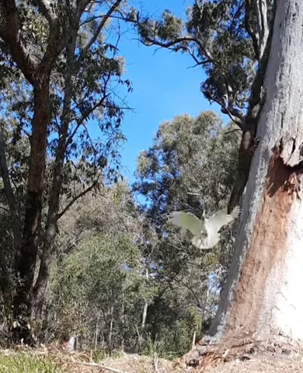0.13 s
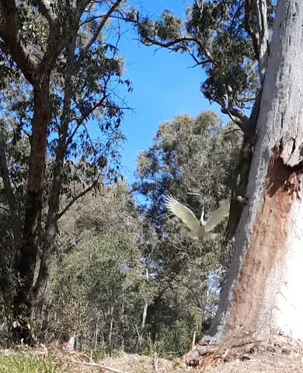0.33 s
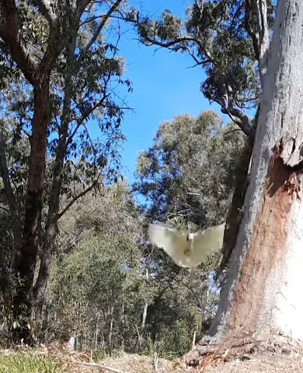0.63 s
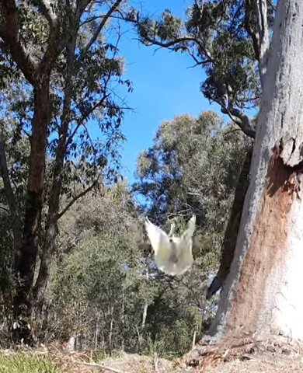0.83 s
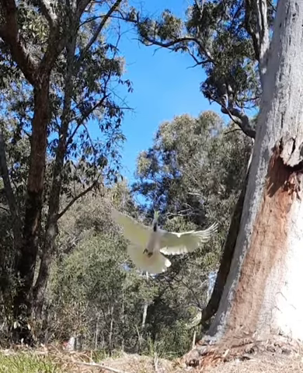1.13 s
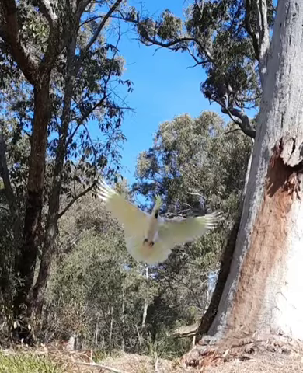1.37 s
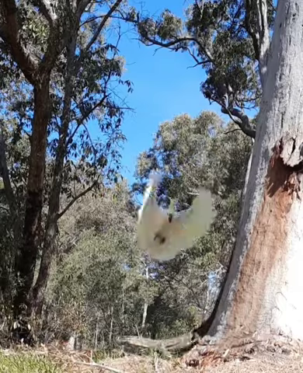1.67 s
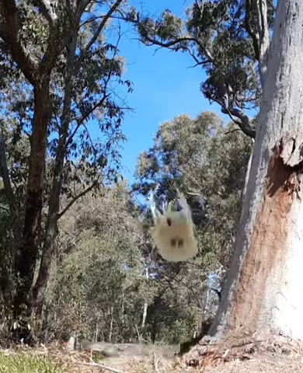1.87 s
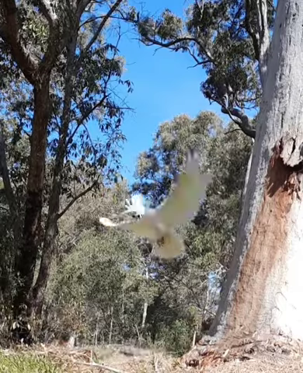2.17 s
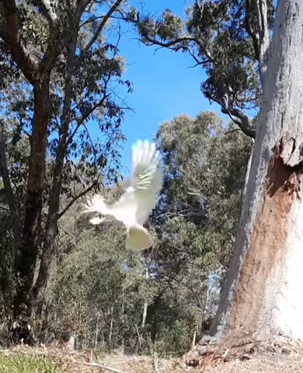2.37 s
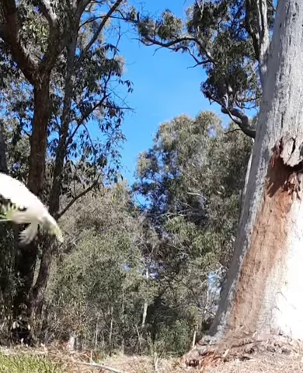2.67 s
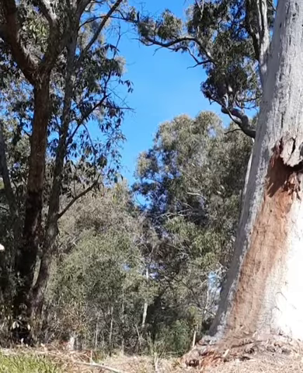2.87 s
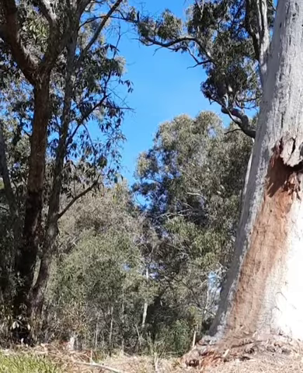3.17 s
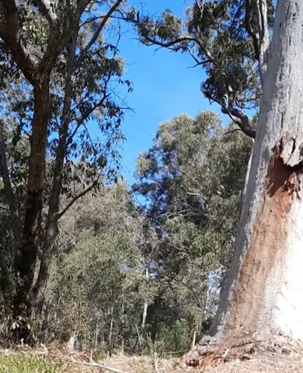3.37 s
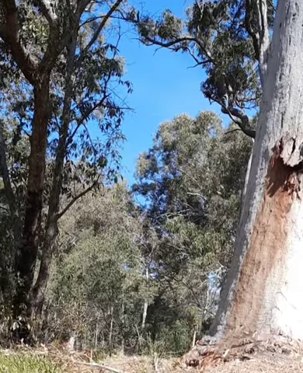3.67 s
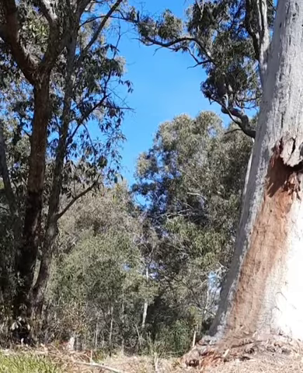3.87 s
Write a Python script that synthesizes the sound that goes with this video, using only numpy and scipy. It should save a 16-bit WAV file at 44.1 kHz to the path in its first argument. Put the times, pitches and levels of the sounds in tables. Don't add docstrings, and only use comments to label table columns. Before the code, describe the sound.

Loud rasping cockatoo screeches repeat in open woodland, with wing flaps as the bird leaves

```python
import sys
import numpy as np
from scipy import signal
from scipy.fft import rfft, irfft, next_fast_len
from scipy.io import wavfile
from scipy.ndimage import map_coordinates

SR = 44100
rng = np.random.default_rng(int(sys.argv[2]) if len(sys.argv) > 2 else 0)


def invert_db(level):
    return 10 ** (np.asarray(level, dtype=float) / 20)


def master(y):
    cut = np.clip(np.atleast_2d(y).T, -1, 1)
    pcm = np.round(cut * 32767)
    wavfile.write(sys.argv[1], SR, pcm.astype(np.int16))


N = 176400

ALIKE = 0.11


def along(points, hz):
    f, v = np.transpose(points)
    return np.interp(np.log(hz + 1), np.log(f + 1), v)


def curve(rows):
    return np.interp(np.arange(N) / SR, *np.transpose(rows))


def unit(x):
    return x / np.sqrt(np.mean(x ** 2) + 1e-20)


def wobble(rate):
    knots = rng.standard_normal(int(N * rate / SR) + 4)
    return map_coordinates(knots, [np.arange(N) * rate / SR])


def filtered(x, response):
    m = next_fast_len(N + SR // 2)
    return irfft(rfft(x, m) * response(np.fft.rfftfreq(m, 1 / SR)), m)[..., :N]


def resonances(table, cut_hz):
    def response(f):
        high_pass = (-f * f / (cut_hz ** 2 - f * f + 1j * f * cut_hz)) ** 2
        total = 0
        for k, (centre, width, db) in enumerate(table):
            ring = 1j * f * width / (centre * centre - f * f + 1j * f * width)
            total = total + (-1) ** k * invert_db(db) * ring
        return high_pass * total
    return response


def noise(spectrum, alike):
    a, b = filtered(rng.standard_normal((2, N)), lambda hz: invert_db(along(spectrum, hz)))
    u = np.arccos(np.clip(alike, 0, 1)) / 2
    return unit(np.array([np.cos(u) * a + np.sin(u) * b, np.cos(u) * a - np.sin(u) * b]))


def cockatoo():
    # (start [s], length [s], level [dB], swell over the call [dB], chest level [dB])
    screeches = [
        (-.4, 0.58, -13, -6, -5),
        (0.318, 0.6, -16, -0.5, -3),
        (1.058, .474, -15, -2.5, -0.5),
        (1.69, 0.58, -15.5, -2, 0),
        (2.448, .562, -19.5, -4, 0.5),
        (3.19, .497, -33.5, 4.5, 8.5),
    ]
    # (time [s], roughness [0-1])
    roughness = [(0, .03), (.066, .03), (.085, 1), (.815, 1), (.83, .03), (.884, .03), (.895, .4),
                 (1.1, .9), (1.26, .9), (1.28, .4), (1.35, .4), (1.37, .8), (1.47, .5), (1.6, 1), (2.15, 1),
                 (2.25, .6), (2.5, .9), (4, 1)]
    # (time [s], level [dB])
    turned = [(0, -2), (.4, 0.5), (1.45, -1), (1.75, -4.5), (1.98, -1.5), (2.05, -7), (2.5, -10.5),
              (2.8, -12.5), (3.3, -18), (3.7, -7)]
    # (frequency [Hz], width [Hz], level [dB])
    chest = [(417, 306, -23), (701, 139, -21.5), (936, 122, -15.5), (1435, 454, -22.5)]
    # (frequency [Hz], width [Hz], level [dB])
    mouth = [(6700, 2700, -32.5), (9200, 1640, -21), (11970, 1870, -20), (15340, 1300, -32.5)]
    slap_hz, start_sag, sag_s, end_sag = 220.43, .38, .06, .2
    attack_s, attack_db, release_s, release_db = 0.071, 13.5, .03, 22
    chest_lingers_db, surge_db, crack_scatter_db = 23, .6, 2
    pipe_db, pipe_turns = 12, .12
    wander, droop = .025, .07

    t = np.arange(N) / SR
    starting, ending, gain, chest_db, loss_db = np.zeros((5, N))
    hz = np.full(N, slap_hz)
    for s, length, db, swell_db, low_db in screeches:
        on = (t >= s) & (t < s + length)
        rise = np.clip(1 - (t - s) / attack_s, 0, 1)
        fall = np.clip(1 - (s + length - t) / release_s, 0, 1)
        level_db = db + swell_db * (t - s) / length
        gain += on * invert_db(level_db - attack_db * rise ** 2 - release_db * fall ** 2)
        hz *= 1 - on * (start_sag * np.clip(1 - (t - s) / sag_s, 0, 1) + end_sag * fall)
        ending += on * fall
        starting += on * rise
        since = t >= s
        chest_db[since] = (low_db + chest_lingers_db * fall ** 2)[since]
        loss_db[since] = screeches[1][2] - db

    whistle, falter = whistles()
    gain *= falter
    rough = curve(roughness)
    slaps = syrinx(hz, rough, starting)
    tuning = 1 + wander * rough * wobble(70) - droop * ending
    drive = invert_db(pipe_db) * slaps * gain * invert_db(surge_db * wobble(15))
    turn_db = curve(turned)
    pipe = windpipe(drive * invert_db(pipe_turns * turn_db), tuning)
    crackle = invert_db(turn_db + crack_scatter_db * rough * wobble(200))
    beak = filtered(drive * crackle, resonances(mouth, 3670))
    body = filtered(drive * invert_db(chest_db), resonances(chest, 400))
    return pipe + beak + body + whistle, loss_db


def syrinx(hz, rough, starting):
    jitter, scatter_db, extra_share, extra_db = .13, 2.2, .65, -4
    calm_db, breath_db = 3, -7.5
    phase = np.cumsum(hz * (1 + jitter * rough * wobble(120))) / SR
    at = np.flatnonzero(np.diff(np.floor(phase)))
    r = rough[at]
    size, extra_size = rng.standard_normal((1200, 2))[:len(at)].T
    coin, lead = rng.random((1200, 2))[:len(at)].T
    ahead = np.maximum(at - ((.2 + .45 * lead ** 2) * SR / hz[at]).astype(int), 0)
    slaps = np.bincount(at, invert_db(scatter_db * r * size), N)
    slaps += np.bincount(ahead, (coin < extra_share * r) * invert_db(extra_db + scatter_db * extra_size), N)
    leak = np.exp(-1.1 * (phase % 1)) * rng.standard_normal(N)
    breath = invert_db(breath_db) * np.sqrt(rough) * (1 - .6 * starting) * unit(leak)
    return unit(slaps) * invert_db(calm_db * (1 - rough)) + breath


def windpipe(drive, tuning):
    # (frequency [Hz], level [dB])
    pipe_modes = [(2070, -2.5), (2790, -1.5), (3800, -2.5), (4800, -10), (5750, -14)]
    relative_width, tunings = .072, (.93, 1, 1.045)
    step = np.interp(tuning, tunings, np.arange(len(tunings)))
    total = np.zeros(N)
    for k, u in enumerate(tunings):
        share = np.clip(1 - np.abs(step - k), 0, 1) ** .7
        modes = [(hz * u, hz * relative_width, db) for hz, db in pipe_modes]
        total += filtered(drive * share, resonances(modes, 1650))
    return total


def whistles():
    # (start [s], length [s], pitch [Hz], level [dB])
    tones = [(.768, .04, 965, -31), (1.356, .016, 1000, -34), (.575, .02, 960, -35), (.68, .022, 950, -35),
             (.72, .02, 990, -35), (1.4, .012, 980, -35)]
    falter_db = -2.5
    t = np.arange(N) / SR
    whistle, falter = np.zeros(N), np.ones(N)
    for s, length, pitch_hz, db in tones:
        bell = np.sin(np.pi * np.clip((t - s) / length, 0, 1)) ** .5
        whistle += invert_db(db) * np.sqrt(2) * bell * np.sin(2 * np.pi * pitch_hz * t)
        falter *= invert_db(falter_db * bell)
    return whistle, falter


def wings():
    # (time [s], level [dB])
    snap_times = [(2.1936, -28), (2.5478, -35), (2.5663, -27), (2.7159, -34), (2.7638, -21), (2.8546, -33),
                  (2.899, -31), (2.96, -34)]
    # (frequency [Hz], level [dB])
    feather = [(1500, -30), (4000, -12), (8000, -7), (10500, 2), (14500, -2)]
    # (time [s], level [dB])
    passing = [(2.3, -71), (2.8, -39.5), (2.97, -47), (3.2, -48), (3.5, -47.5), (3.8, -69.5)]
    # (frequency [Hz], level [dB])
    swish_colour = [(800, -21), (2000, 8), (4500, 12), (7000, 11.5), (8500, 7), (10500, 15), (14500, -3)]
    snap_db, snap_t60_s, flap_db = 9, .005, 2
    clap_s, clap_hz, clap_db, clap_len_s = 2.762, 1880, -21, .011

    t, snaps = np.arange(N) / SR, np.zeros(N)
    for s, db in snap_times:
        snaps += (t >= s) * invert_db(db + snap_db - 60 * np.abs(t - s) / snap_t60_s)
    snaps = filtered(snaps * rng.standard_normal(N), lambda hz: invert_db(along(feather, hz)))
    bell = np.exp(-((t - clap_s) / clap_len_s) ** 2)
    clap = invert_db(clap_db) * bell * np.sin(2 * np.pi * clap_hz * t + 0.85 * wobble(170))
    swish_db = curve(passing) + flap_db * wobble(9) + 1.23 * wobble(60)
    return snaps + clap, invert_db(swish_db) * noise(swish_colour, ALIKE)


def trees(x):
    # (frequency [Hz], time to fall 60 dB [s])
    decay = [(400, .45), (1500, .6), (2500, .66), (5000, .6), (12000, .5)]
    # (frequency [Hz], level [dB])
    echo_colour = [(400, -3), (1500, 0), (2050, 1), (3000, -1), (5000, 0), (12000, -2)]
    delay_s = .015
    hz, t, z = signal.stft(rng.standard_normal((2, SR)), SR, nperseg=256)
    fade_db = along(echo_colour, hz)[:, None] - 60 * t / along(decay, hz)[:, None]
    a, b = signal.istft(z * invert_db(fade_db), SR, nperseg=256)[1]
    tail = np.array([a, ALIKE * a + np.sqrt(1 - ALIKE ** 2) * b])
    late = np.pad(x, (int(delay_s * SR), 0))[None]
    return signal.fftconvolve(late, 3 * tail / np.linalg.norm(a), axes=1)[:, :N]


def woodland_air():
    # (frequency [Hz], level [dB])
    air_colour = [(150, -6), (500, -7), (1400, -16), (2200, -6), (4000, -11), (7500, -26), (10000, -36),
                  (15000, -28)]
    return invert_db(-59) * noise(air_colour, ALIKE)


def right_port(x):
    # (time [s], level [dB])
    pan = [(0, 0), (1.7, -.2), (2.3, -1.3), (2.9, -1.8), (3.2, .5), (4, 0)]
    # (frequency [Hz], level [dB])
    shadow = [(500, -.5), (1550, -6.5), (2600, -2.24), (3600, 1), (5700, -5.5), (7400, 0.5), (9800, 31.5),
              (12500, 15)]
    # (frequency [Hz], phase [rad])
    lead = [(0, 0), (950, .2), (2500, 2.15), (3600, 2.7), (4650, 3.2), (5700, 3.8), (6800, 5.6),
            (10800, 6.2)]
    lag_s = .00011

    def response(hz):
        phase = np.interp(hz, *np.transpose(lead))
        phase = phase + 2 * np.pi * lag_s * np.maximum(hz - lead[-1][0], 0)
        return invert_db(-along(shadow, hz)) * np.exp(-1j * phase)
    return filtered(x * invert_db(-curve(pan)), response)


def breeze():
    # (time [s], level [dB])
    gusts = [(0.0, -53), (0.52, -66), (0.79, -53), (0.88, -85.5), (0.97, -49), (1.04, -65), (1.08, -49),
             (1.15, -59), (2.51, -72), (2.53, -64), (3.19, -67.5), (3.79, -55.5), (3.81, -65.5),
             (4.0, -59.5)]
    # (frequency [Hz], level [dB])
    rumble = [(20, -46), (35, -34), (55, -6), (77, 7), (105, -9), (165, -8.5), (220, -33), (400, -42)]
    return invert_db(curve(gusts)) * noise(rumble, .55)


def scene():
    trees_db, far_wet = -29, 0.61
    bird, loss_db = cockatoo()
    snaps, swish = wings()
    echoes = invert_db(trees_db) * trees(bird * invert_db(far_wet * loss_db) + snaps)
    left, right = bird + snaps + echoes + swish + woodland_air()
    return np.array([left, right_port(right)]) + breeze()


def low_pass(x):
    return signal.sosfilt(signal.butter(12, 15870, fs=SR, output="sos"), x)


def record(dry):
    ceiling, top_hz = .96, 15850
    held = dry / (1 + np.abs(dry / ceiling) ** 10) ** (1 / 10)
    mix = filtered(held, lambda hz: hz < top_hz)
    return low_pass(mix)


dry = scene()
out = record(dry)
master(out)
```